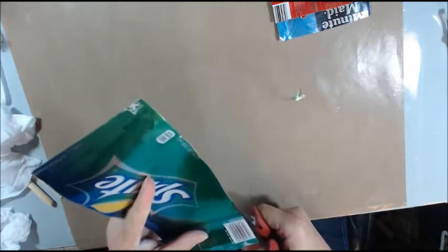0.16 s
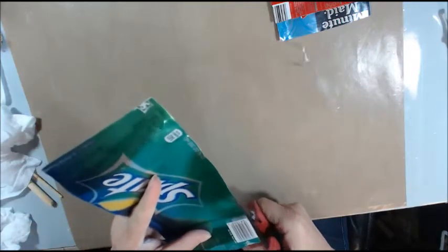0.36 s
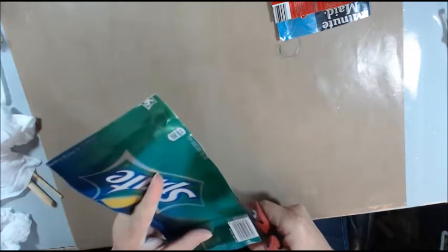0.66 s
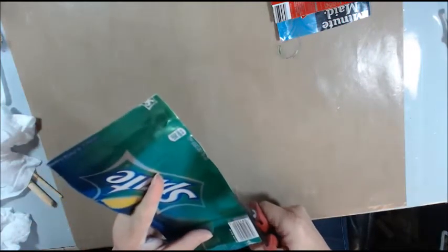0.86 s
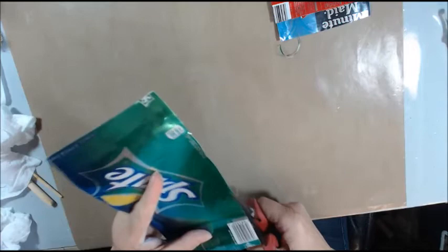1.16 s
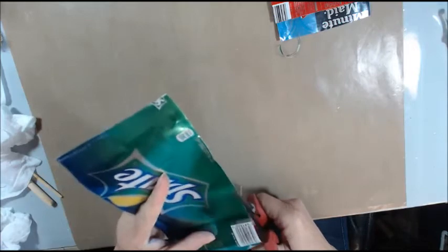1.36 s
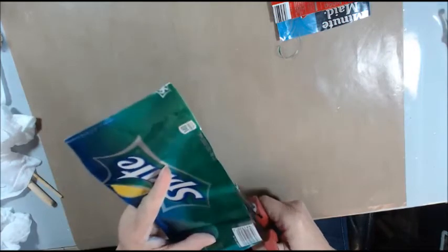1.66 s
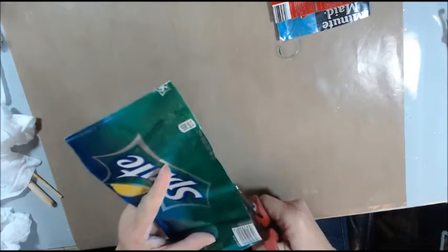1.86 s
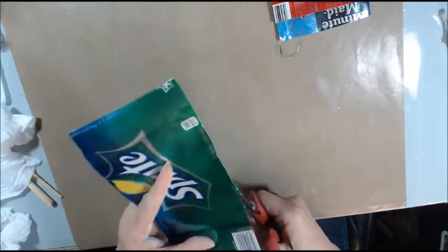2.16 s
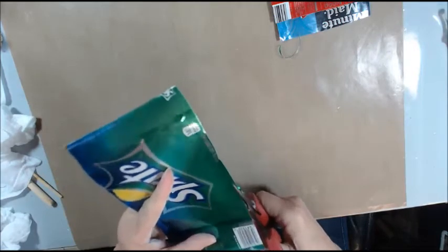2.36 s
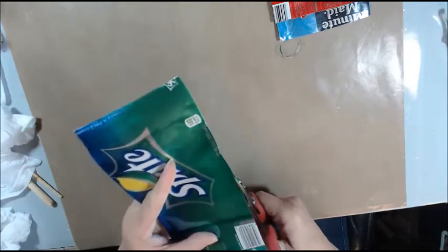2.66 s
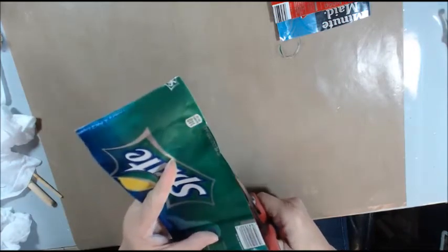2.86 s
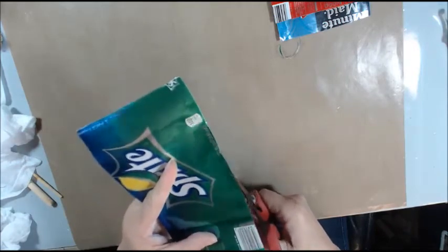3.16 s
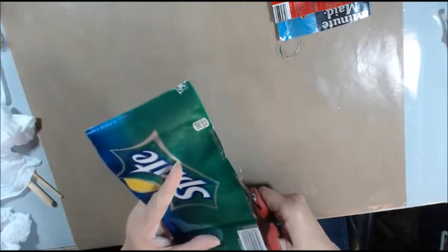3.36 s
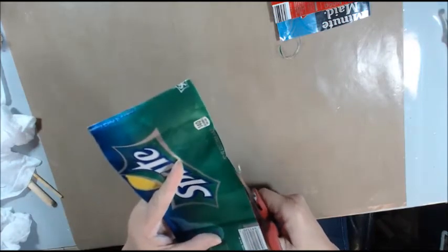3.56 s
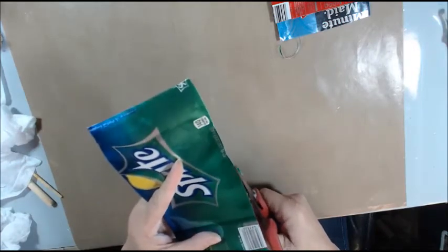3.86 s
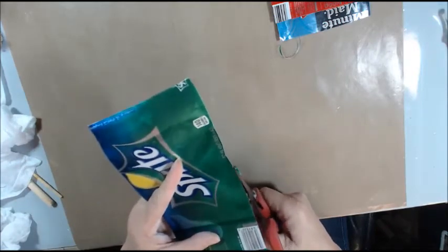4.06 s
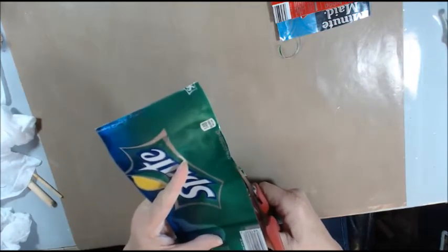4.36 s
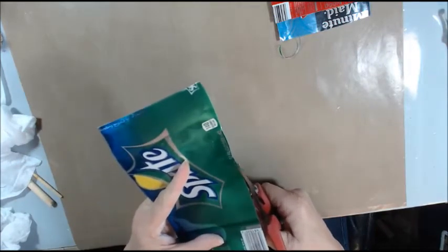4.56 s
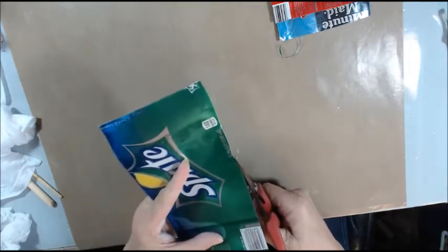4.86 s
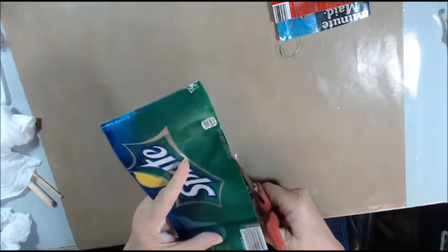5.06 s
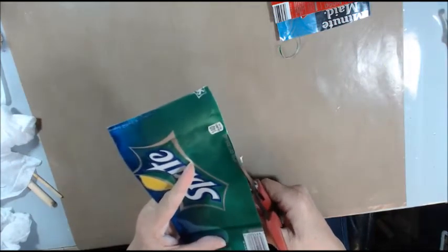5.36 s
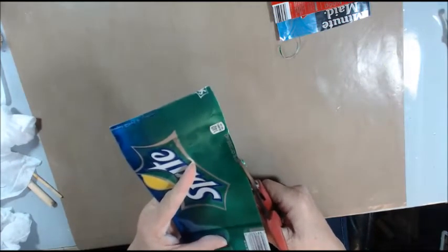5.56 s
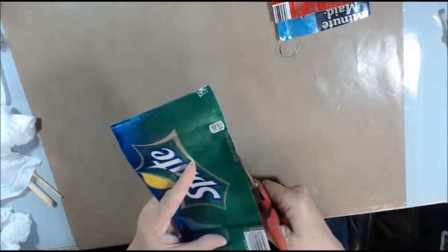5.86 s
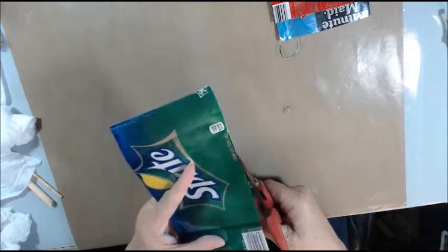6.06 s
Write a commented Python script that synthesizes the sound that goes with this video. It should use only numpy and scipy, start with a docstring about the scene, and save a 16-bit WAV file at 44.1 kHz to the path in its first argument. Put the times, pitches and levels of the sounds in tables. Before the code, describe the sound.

Scissors trim the edge of a thin sheet of drinks-can aluminium above a table in a small room. After a few faint scrapes and ticks, the metal gives way in irregular crisp snaps, with gritty grinding and short rasps as the blades slide along the edge. Softer snips follow, then one loud, sharp snap near the end. A faint low rumble and hum grow underneath, and a small microphone dulls the highest treble.

```python
"""In a small room, above a table, scissors trim the edge of a sheet of thin drinks-can aluminium.
Each closing stroke grinds through the metal, which snaps in runs of tiny fractures; between cuts the
blades rasp open along the edge. Friction adds hisses and squeaks, and the sheet buckles with low taps.
Every contact excites the sheet's modes and a brief reverberation. Underneath lie a low rumble,
mains hum, faint air and soft handling bumps. A small microphone dulls the highest treble."""
import sys
import numpy as np
from scipy import signal
from scipy.fft import rfft, irfft, next_fast_len
from scipy.io import wavfile
from scipy.ndimage import uniform_filter1d

SR = 44100
rng = np.random.default_rng(int(sys.argv[2]) if len(sys.argv) > 2 else 0)


def transcribe(u):
    """Save the signal u as a 16-bit wav file named by the first command-line argument.

    u: samples, shape (n,) or (channels, n), limited to [-1, 1]; the rate is SR.
    q: integer samples, one column per channel.
    """
    v = np.clip(np.atleast_2d(u).T, -1, 1)
    q = np.round(v * 32767).astype(np.int16)
    wavfile.write(sys.argv[1], SR, q)


N = 273905

# Level of the low rumble and hum: the background drops briefly near 2.2 s and 3 s and grows louder toward the
# end. Each row: time in seconds, relative level in dB.
RUMBLE = [(0, -54), (2.2, -57), (2.45, -46.5), (2.95, -54), (3.2, -48.5), (4.4, -42.5), (5.7, -43),
          (6.21, -42.5)]
# Mains hum. Each row: frequency in Hz, level in dB relative to the rumble.
HUM = [(57, -5.5), (120, -8.5)]
# Spectra of the noise sources. Each row: frequency in Hz, relative level in dB.
RUMBLE_COLOUR = [(11, -54), (18, -0.5), (54, -1.5), (91, -6), (123, -5), (133, -9), (151, -14), (201, -18),
                 (268, -19.5), (309, -27.5), (400, -28.5), (520, -45.5), (880, -120)]
AIR_COLOUR = [(100, -24.5), (300, -5), (560, 4), (850, -4), (1400, -10.5), (3000, -20.5), (8000, -23.5),
              (15000, -32.5)]
BUMP_COLOUR = [(20, -5), (70, 7), (130, 2), (260, -18.5), (500, -38), (900, -100)]
HISS_COLOUR = [(3000, -67), (7000, -25.5), (10500, 14), (15000, 12)]
RASP_COLOUR = [(180, -64), (300, -14.5), (500, -11), (1000, -3), (1400, -11), (2300, -9), (3300, -6.5),
               (5000, -9), (7000, -5.5), (9000, -4.5), (10000, -9.5), (15000, -8.5)]
SHEAR_COLOUR = [(290, -23), (550, -9.5), (950, 2), (1700, -4), (2300, 0), (6400, -5), (10000, -9),
                (15000, 0)]
# Microphone response. Each row: frequency in Hz, gain in dB.
MICROPHONE = [(20, -7), (9700, 1), (10300, -18.5), (11800, -11.5), (12300, -23.5), (15000, -25)]
# Reverberation time of the room. Each row: frequency in Hz, seconds to decay by 60 dB.
ROOM_T60 = [(250, 0.36), (700, 0.23), (1800, 0.19), (4600, 0.19), (9000, 0.11), (14000, 0.067)]
# Modes of the sheet and steel blades. Each row: frequency in Hz, bandwidth in Hz, strength in dB.
SHEET_MODES = [(455, 50, -8), (598, 35, 1), (900, 40, -1), (1108, 18, 5), (1395, 30, -5), (1706, 30, -3),
               (2000, 80, -3), (2390, 80, -3), (4340, 40, -3), (4662, 24, -1), (5533, 26, -6),
               (6649, 28, -5), (6910, 38, 0), (8025, 55, -2), (8492, 45, -2), (9140, 65, -1)]
# Handling bumps. Each row: time of the peak in seconds, relative level in dB.
BUMPS = [(2.44, -62), (4.355, -41), (4.569, -50), (5.361, -42.5), (5.599, -35.5), (5.911, -42.5)]
# The sheet buckles as the cut lets go. Each row: start in seconds, relative level in dB, pitch in Hz.
BUCKLES = [(1.528, -37, 578), (1.558, -37.5, 540), (1.885, -41, 522), (2.902, -45, 640)]
# A blade squeaks on the cut edge. Each row: start and hold in seconds, relative level in dB, pitch in Hz.
SQUEAKS = [(0.392, 0.0083, -56, 8150), (1.55, .014, -36.5, 13300), (2.026, 0.0053, -51.5, 7830),
           (2.23, 0.017, -46.5, 9100)]
# Steel squeezes past steel. Each row: start and hold in seconds, relative level and its change in dB.
HISSES = [(2.08, 0.026, -47, 14), (4.105, 0.03, -42, -11), (5.665, 0.055, -38, 8.5),
          (6.178, .032, -27.5, 9)]
# Blades slide along the edge. Each row: start and hold in seconds, relative level and its change in dB,
# gain of the sheet's body in dB, rise in dB per second, local resonance in Hz, its strength in dB.
RASPS = [(0.203, 0.078, -43, -4.5, -3, 476, 600, -6), (1.15, 0.023, -40, 2, -1.5, 610, 1650, -23),
         (1.924, 0.025, -32, -13, -12.5, 1192, 6400, -8.5), (3.151, 0.062, -37.5, -4, -4.5, 590, 2110, -1),
         (4.133, 0.07, -40, -6, -1.5, 549, 2010, 3.5), (5.15, 0.055, -44, 0.5, -5, 401, 2150, 4.5),
         (6.189, 0.042, -32, 6, -7.5, 753, 2400, 1)]
# Blades press through the metal between snaps. Each row: start and hold in seconds,
# relative level and its change in dB, gain of the sheet's body in dB.
SHEARS = [(.545, 0.24, -56.5, -5.5, 4), (1.42, .032, -52, -13, -2.5), (1.524, 0.27, -45.5, -2, -4.5),
          (1.865, 0.065, -41, 2, -3), (2.095, .021, -34, 0, -3), (2.2, 0.18, -41.5, -14, -1),
          (2.505, 0.038, -50.5, 13, -1), (2.68, 0.16, -55.5, 7.5, -3.5), (3.49, 0.32, -52, 4, -5),
          (4.44, 0.38, -56.5, -4.5, 2), (4.91, .035, -50, 2.5, -4), (5.47, 0.38, -50, 6, -7.5),
          (5.732, .026, -38.5, 1, 1), (6.07, .11, -49, -3, -10)]
# Scissors knock on the sheet, some with a softer rebound.
# Each row: time in seconds, relative level in dB, lower corner frequency in Hz.
KNOCKS = [(0.3306, -35, 870), (0.363, -47.5, 653), (3.138, -38.5, 860), (3.306, -45.5, 800),
          (4.187, -42, 1130), (6.026, -48, 997), (6.044, -48, 740), (6.06, -58, 600)]
# A blade flicks free of a burr. Each row: time in seconds, relative level in dB,
# lower corner frequency in Hz, length in seconds, local resonance in Hz.
TICKS = [(.097, -49, 4600, 0.0074, 4000), (0.511, -58.5, 3470, .007, 4300),
         (0.661, -58, 3230, 0.0079, 4540), (0.706, -56.5, 3430, 0.0086, 7900),
         (0.753, -55, 3450, 0.0079, 8000), (1.223, -44, 2000, 0.0016, 2400),
         (1.438, -48.5, 2770, 0.0085, 3700), (1.5548, -21, 7800, 0.0065, 8040),
         (1.605, -24.5, 7500, 0.0098, 8500), (1.647, -24.5, 7500, 0.0091, 8400),
         (2.682, -30.5, 8200, 0.0047, 8270), (2.782, -41.5, 3420, 0.0022, 5000),
         (2.831, -40, 3100, 0.0028, 3450), (3.644, -45, 3500, 0.0034, 5750),
         (3.725, -46.5, 2830, 0.0036, 3150), (4.446, -47.5, 3540, .004, 6500),
         (4.615, -51, 2300, 0.0028, 2450), (4.635, -49, 2600, 0.0026, 2450),
         (4.691, -45.5, 2600, 0.0058, 5930), (4.723, -46, 2920, 0.0061, 4360),
         (4.759, -30, 6900, 0.0051, 9700), (5.875, -40, 5700, 0.0055, 8700)]
# The metal gives way. Each row: time in seconds, relative level in dB, lower corner frequency in Hz,
# tilt above it in dB per octave, length in seconds, relative thump of the sheet in dB,
# local resonance in Hz, its strength in dB.
SNAPS = [(0.587, -46.5, 2490, -5, 0.02, 11, 4750, 15), (0.773, -49.5, 2380, -8, 0.017, 10, 2500, -13),
         (0.875, -44, 2600, -8, 0.009, 9, 3100, 12), (1.1336, -32, 1490, -3, 0.0091, 4, 1860, 23),
         (1.2483, -25, 1500, -5.5, 0.0047, -19, 4450, 5), (1.257, -40, 1500, -15, 0.0066, -8, 1750, 3),
         (1.47, -47, 2000, -2, 0.011, -13, 3000, -13), (1.522, -21, 3200, -3.5, 0.0096, -16, 3500, 4.5),
         (1.586, -30, 3000, -3.5, 0.0056, -17.5, 4630, 6), (1.676, -32.5, 2500, -6, 0.029, -4.5, 8500, 9),
         (1.686, -16, 1880, -2, 0.0057, -25.5, 6780, 7), (1.8822, -23, 920, -2, 0.011, 3, 1090, -10),
         (1.911, -23.5, 1690, -2.5, 0.01, -13, 6400, -11.5),
         (2.1234, -18.5, 1100, -3.5, 0.0095, -30, 3600, 4), (2.322, -35.5, 990, -3, 0.01, -1.5, 1130, 5.5),
         (2.53, -26.5, 940, -9, 0.0093, -13.5, 2150, 0), (2.7287, -30.5, 2090, 1, 0.0084, -0.5, 5060, 9.5),
         (2.868, -39.5, 2180, 0.5, 0.015, -22.5, 2170, 2), (2.895, -39, 1510, -1, 0.015, 2.5, 2480, -10.5),
         (3.486, -42, 3480, -0.5, 0.01, -27, 7100, 3), (3.534, -36, 3600, 1, 0.0046, -20, 8500, -10),
         (3.581, -31, 1080, 0.5, 0.0084, 5, 8360, 3), (3.668, -37, 3430, -1, 0.0056, 2, 6240, 16),
         (3.764, -38.5, 1790, 0.5, 0.013, 1, 4130, -5), (3.894, -30, 950, -2, 0.0055, -10, 8450, 8),
         (4.129, -33, 1500, 5, 0.018, -16.5, 4150, 12), (4.493, -39.5, 3620, -1, 0.0047, 2, 6240, 16),
         (4.576, -32.5, 2240, -3.5, 0.0071, 1.5, 2460, 8), (4.931, -42, 1700, 1, 0.012, 5.5, 9300, 7),
         (5.514, -45, 2580, 0.5, 0.014, 3.5, 6700, 3), (5.577, -37.5, 1300, -1.5, 0.014, 4, 7750, -14),
         (5.7492, -11.5, 1280, 1, .008, -10, 2400, -1), (5.756, -29, 1090, -4, .01, -1, 2300, 2),
         (6.101, -38.5, 1830, 0.5, 0.0094, -20, 4250, -8)]

LEAD_S = .03  # a faint swell of noise leads into each click


def amp(db):
    """Amplitude ratio of a level in decibels."""
    return 10 ** (np.asarray(db) / 20)


def unit(x):
    """Normalisation to rms 1."""
    return x / np.sqrt(np.mean(x ** 2) + 1e-20)


def read(points, hz):
    """Interpolation of a table along log frequency."""
    f, value = np.transpose(points)
    return np.interp(np.log(hz + 1), np.log(f + 1), value)


def colour(x, points):
    """Zero-phase filtering by a table of frequency in Hz and gain in dB."""
    size = next_fast_len(len(x))
    gain = amp(read(points, np.fft.rfftfreq(size, 1 / SR)))
    return irfft(rfft(x, size) * gain, size)[:len(x)]


def add(mix, s, sound):
    """Superposition: a sound joins the mix at s seconds."""
    part = mix[max(round(s * SR), 0):][:len(sound)]
    part += sound[:len(part)]


def drift(hz):
    """Random modulation of rms 1, with hz new values a second."""
    t = np.arange(N) / SR
    return unit(np.interp(t * hz, np.arange(4096), rng.standard_normal(4096)))


def noise(spectrum):
    """Coloured Gaussian noise of rms 1."""
    return unit(colour(rng.standard_normal(N), spectrum))


def background(rumble_db=-2, air_db=-64, waver_db=2, wander_rad=0.78):
    """Amplitude modulation: a low rumble and wavering hum grow toward the end, over steady air; the background
    drops briefly now and then."""
    t = np.arange(N) / SR
    rumble = amp(rumble_db) * noise(RUMBLE_COLOUR)
    hum = np.zeros(N)
    for hz, db in HUM:
        peak = np.sqrt(2) * amp(db + waver_db * drift(hz=4.3))
        hum += peak * np.sin(2 * np.pi * hz * t + wander_rad * drift(hz=7.1))
    level = amp(np.interp(t, *np.transpose(RUMBLE)))
    return level * (rumble + hum) + amp(air_db) * noise(AIR_COLOUR)


def bumps(level_db=-1, length_s=0.021):
    """Handling noise: each bump is a dull shudder under a Gaussian envelope."""
    t = np.arange(N) / SR
    envelope = sum(amp(db) * np.exp(-((t - s) / length_s) ** 2) for s, db in BUMPS)
    return amp(level_db) * envelope * noise(BUMP_COLOUR)


def room(x, wet_db=-4.0, first_s=0.0027):
    """Diffuse reverberation: dense reflections from table and near walls, the treble dying first."""
    hz, t, frames = signal.stft(rng.standard_normal(SR // 2), SR, nperseg=256)
    decay = amp(-60 * t / read(ROOM_T60, hz)[:, None])
    spectrum = rfft(signal.istft(frames * decay, SR, nperseg=256)[1])
    spectrum /= np.sqrt(uniform_filter1d(abs(spectrum) ** 2, size=31))  # no pitch stands out
    tail = irfft(spectrum)[:SR // 3]
    tail *= np.clip(np.arange(len(tail)) / SR / first_s - 1, 0, 1)
    return x + amp(wet_db) * signal.oaconvolve(x, tail / np.linalg.norm(tail))[:N]


def table_echo(x, strength=.18):
    """Early reflection: the table returns each contact with a lag that shifts as the hands move."""
    lag = round(rng.uniform(.0011, .0021) * SR)
    return x + strength * np.pad(x, (lag, 0))[:len(x)]


def mode(hz, width_hz, samples):
    """Impulse response of a damped resonator: the wider its band, the faster it decays."""
    t = np.arange(samples) / SR
    return 2 * np.pi * width_hz / SR * np.exp(-np.pi * width_hz * t) * np.cos(2 * np.pi * hz * t)


def sheet(x, level_db=-3):
    """Modal response: every contact is heard directly and through the ringing of sheet and blades."""
    response = sum(amp(db) * mode(hz, width_hz, SR // 3) for hz, width_hz, db in SHEET_MODES)
    return amp(level_db) * (x + signal.oaconvolve(x, response)[:N])


def ring(x, hz, db, width_hz):
    """Resonance: a sound plus the one short mode that it excites."""
    return x + amp(db) * signal.oaconvolve(x, mode(hz, width_hz, 1500))[:len(x)]


def local_ring(x, ring_hz, ring_db, width_hz=230, faint_db=-7, faint_width_hz=75, count=40):
    """Local resonance: each point on the edge has one short mode of its own among many faint ones."""
    t = np.arange(1500) / SR
    hz = np.linspace(1500, 10000, count) + rng.uniform(-100, 100, count)
    faint = np.cos(2 * np.pi * (hz[:, None] * t + rng.random((count, 1)))).sum(0)
    faint *= np.exp(-np.pi * faint_width_hz * t)
    faint *= amp(faint_db) / np.linalg.norm(faint)
    return ring(x, ring_hz, ring_db, width_hz) + signal.oaconvolve(x, faint)[:len(x)]


def body_of(x, split_hz):
    """Radiation by the whole sheet: the low band of a scrape."""
    return signal.sosfiltfilt(signal.butter(2, split_hz, fs=SR, output="sos"), x)


def flexing(x, depth_db=4, patch_hz=170, patch_s=.06):
    """Time-varying resonance: as the cut advances and the sheet bends, its finer modes swell and fade."""
    hz, t, frames = signal.stft(x, SR, nperseg=512, noverlap=384)
    patches = rng.standard_normal(frames.shape)
    for _ in range(2):
        patches = uniform_filter1d(patches, round(patch_s / t[1]), axis=1)
        patches = uniform_filter1d(patches, round(patch_hz / hz[1]), axis=0)
    swing_db = depth_db * np.minimum(hz / 2000, 1)[:, None]
    gain = amp(swing_db * np.minimum(unit(patches), 1.5))
    gain /= np.sqrt(uniform_filter1d(gain ** 2, size=25, axis=0))  # one gains where its neighbours lose
    return signal.istft(frames * gain, SR, nperseg=512, noverlap=384)[1][:N]


def bending(x, lag_s=0.00186, at_hz=1000, zero_lag_hz=7000):
    """Dispersion: bending waves travel faster the higher they are, so the bass trails the treble."""
    size = next_fast_len(N + SR // 10)
    hz = np.fft.rfftfreq(size, 1 / SR)
    turns = lag_s * (2 * np.sqrt(at_hz * hz) - hz * np.sqrt(at_hz / zero_lag_hz))
    return irfft(rfft(x, size) * np.exp(-2j * np.pi * turns), size)[:N]


def buckles(rise_s=.002, decay_s=.005):
    """Buckling: a low, heavily damped mode of the sheet gives a soft tap."""
    t, out = np.arange(SR // 8) / SR, np.zeros(N)
    envelope = 2 * (1 - np.exp(-t / rise_s)) * np.exp(-t / decay_s)
    for s, db, pitch_hz in BUCKLES:
        add(out, s, amp(db) * envelope * np.sin(2 * np.pi * pitch_hz * t))
    return out


def strokes(rows, rise_db_per_s=782, fall_db_per_s=488.5):
    """Friction envelope: the blade bites, holds while the grip firms or eases, and lets go."""
    gain, t = np.zeros(N), np.arange(N) / SR
    for start, length, db, change_db in rows:
        hold_db = db + change_db * np.clip((t - start) / max(length, .005), 0, 1)
        fade_db = rise_db_per_s * np.maximum(start - t, 0)
        fade_db += fall_db_per_s * np.maximum(t - start - length, 0)
        audible = fade_db < 80
        gain[audible] += amp(hold_db[audible] - fade_db[audible])
    return gain


def squeaks(width_hz=1400):
    """Stick-slip motion: a fast-catching blade gives a rough, very high whistle."""
    hz, out = np.fft.rfftfreq(SR, 1 / SR), np.zeros(N)
    for s, length, db, pitch_hz in SQUEAKS:
        band = np.exp(-((hz - pitch_hz) / width_hz) ** 2)
        whistle = unit(irfft(rfft(rng.standard_normal(SR)) * band))
        out += strokes([(s, length, db, 0)]) * np.resize(whistle, N)
    return out


def hisses():
    """Sliding friction: the two blades rub hard on each other with a fine hiss."""
    return strokes(HISSES) * noise(HISS_COLOUR)


def fracture(envelope):
    """Brief impulses are broadband: a dense run of tiny cracks covers all frequencies evenly."""
    spectrum = rfft(rng.standard_normal(len(envelope)) * envelope)
    power = uniform_filter1d(abs(spectrum) ** 2, size=len(envelope) // 110)
    return irfft(spectrum / np.sqrt(power), len(envelope))


def rasps(judder_db=2.8, judder_hz=190, before_s=.12, span_s=.4):
    """Roughness excitation: a blade skids along the jagged edge, the sheet's body sounding below it."""
    out = np.zeros(N)
    for start, *stroke, body_db, rise_db_per_s, ring_hz, ring_db in RASPS:
        force = strokes([(start, *stroke)], rise_db_per_s, fall_db_per_s=317)
        force *= amp(judder_db * drift(judder_hz))
        force = force[round((start - before_s) * SR):][:round(span_s * SR)]
        slips = ring(colour(fracture(force), RASP_COLOUR), ring_hz, ring_db, width_hz=700)
        body = body_of(slips, split_hz=2870)
        scrape = unit(slips - body) + amp(body_db) * unit(body)
        add(out, start - before_s, np.sqrt(np.mean(force ** 2)) * scrape)
    return out


def grains(per_s, spread_db):
    """Shot noise: tiny slips of metal on metal click at random times with random sizes."""
    size = amp(spread_db * np.minimum(rng.exponential(1, N), 4))
    return unit(size * rng.standard_normal(N) * (rng.random(N) < per_s / SR))


def shears(level_db=2):
    """Shearing: many small slips merge into gritty rubbing as the blades work through the metal."""
    slips = grains(per_s=2200, spread_db=2) * amp(4 * drift(hz=140))
    slips = unit(colour(slips, SHEAR_COLOUR))
    body = body_of(slips, split_hz=4200)
    return amp(level_db) * sum(strokes([stroke]) * (slips - body + amp(body_db) * body)
                               for *stroke, body_db in SHEARS)


def contact_spectrum(db, corner_hz, tilt, thump_db, thump_hz=610, low_cut_hz=310, top_hz=10500):
    """Impact spectrum: weak below its corner, tilted above it, with a soft thump of the whole sheet."""
    hz = np.geomspace(100, 16000, 60)
    gain = amp(tilt * np.log2(np.maximum(hz / corner_hz, 1))) / np.hypot(1, (corner_hz / hz) ** 2)
    gain /= gain[hz < top_hz].max()
    thump = amp(thump_db) * np.exp(-(np.log2(hz / thump_hz) / .7) ** 2)
    gain = np.hypot(gain, thump) / np.hypot(1, (low_cut_hz / hz) ** 4)
    top_db = -9 + 0.35 * (db + 40)  # harder contacts reach higher
    return np.column_stack([hz, 20 * np.log10(gain) + top_db * (hz > top_hz)])


def contact(db, corner_hz, tilt, length_s, thump_db, ring_hz, ring_db):
    """Stress release: after a faint swell of noise, the metal gives in tiny cracks and shivers to rest."""
    lead_in_db, lead_in_s = -20, 0.016
    rise_s, flutter_db, flutter_s = .0004, -16, 0.0052
    t = np.arange(6000) / SR - LEAD_S
    after = np.maximum(t, 0)
    lead_in = amp(lead_in_db) * np.exp(-after / rise_s + np.minimum(t, 0) / lead_in_s)
    run = np.exp(-(after / max(length_s, .001)) ** 4)
    flutter = amp(flutter_db) * np.exp(-after / flutter_s)
    envelope = lead_in + (1 - np.exp(-after / rise_s)) * (run + flutter)
    burst = table_echo(local_ring(fracture(envelope), ring_hz, ring_db))
    burst = colour(burst, contact_spectrum(db, corner_hz, tilt, thump_db))
    return amp(db) * burst * np.linalg.norm(envelope) / np.linalg.norm(burst)


def sharp_contacts():
    """Impulsive excitation: snaps, thin ticks and dull knocks cross the sheet as bending waves."""
    out = np.zeros(N)
    for s, *snap in SNAPS:
        add(out, s - LEAD_S, contact(*snap))
    for s, db, hz, length_s, ring_hz in TICKS:
        tick = contact(db, hz, tilt=-4, length_s=length_s, thump_db=-18.5, ring_hz=ring_hz, ring_db=9)
        add(out, s - LEAD_S, tick)
    for s, db, hz in KNOCKS:
        knock = contact(db, hz, tilt=-15.5, length_s=0.008, thump_db=-19, ring_hz=hz, ring_db=0)
        add(out, s - LEAD_S, knock)
    return bending(out)


def scene():
    """Source and resonator: the cutting drives the sheet and the room, above the background."""
    cutting = sharp_contacts() + buckles() + flexing(rasps() + shears()) + hisses() + squeaks()
    return (room(sheet(cutting)) + background() + bumps())[None]


def record(dry, edge_hz=15700):
    """Band limiting: a small microphone, dull above 10 kHz, then a steep low-pass filter."""
    heard = colour(dry[0], MICROPHONE)
    low_pass = signal.firwin(511, edge_hz, window=("kaiser", 9), fs=SR)
    return signal.oaconvolve(heard, low_pass, "same")[None]


dry = scene()
out = record(dry)
transcribe(out)
```